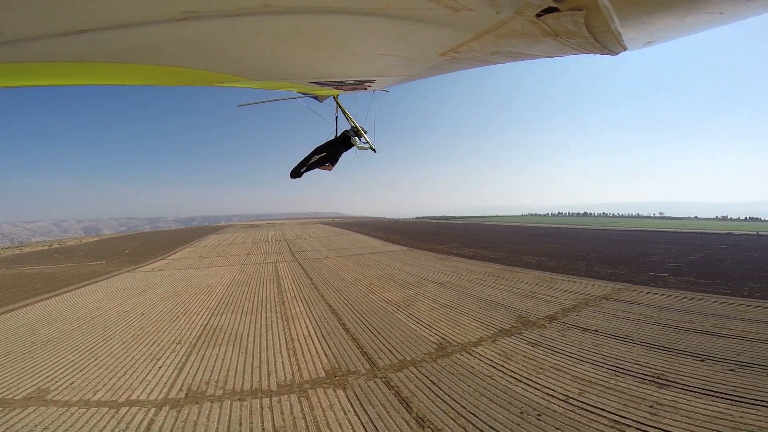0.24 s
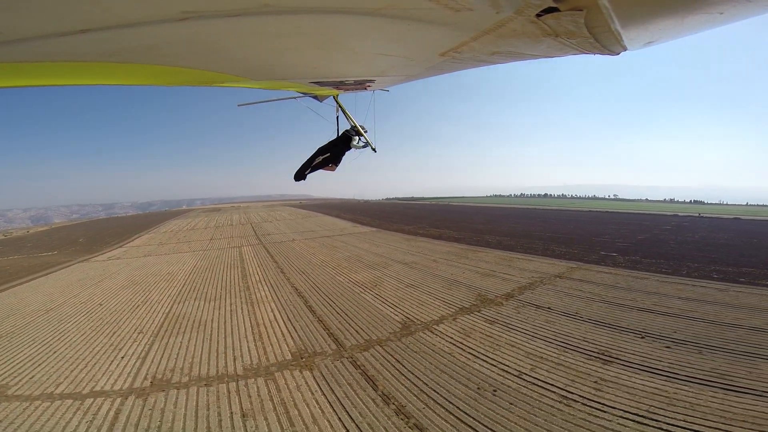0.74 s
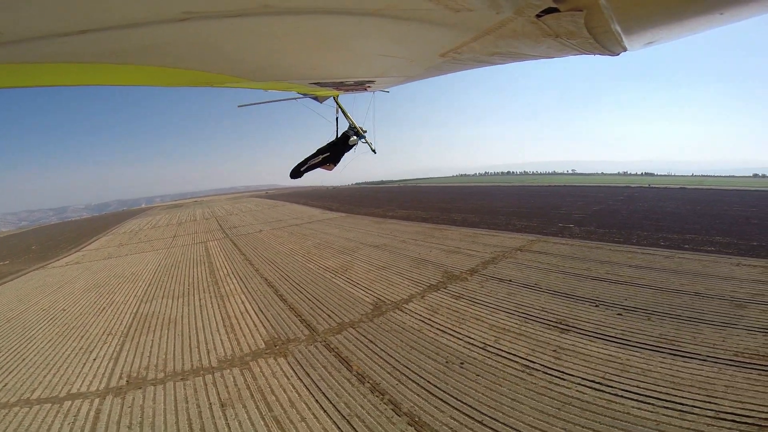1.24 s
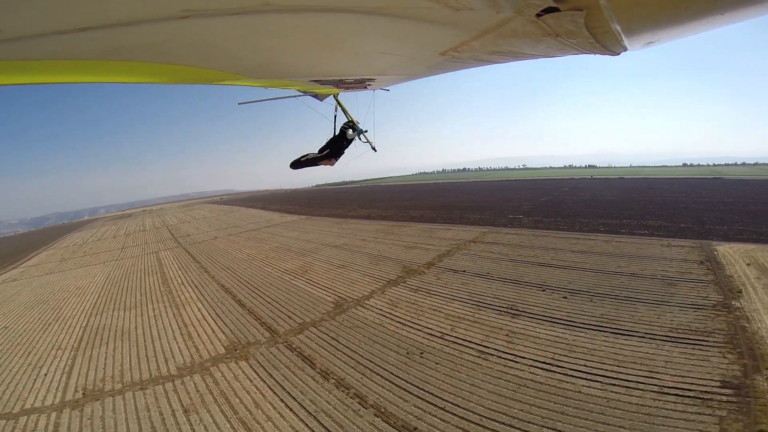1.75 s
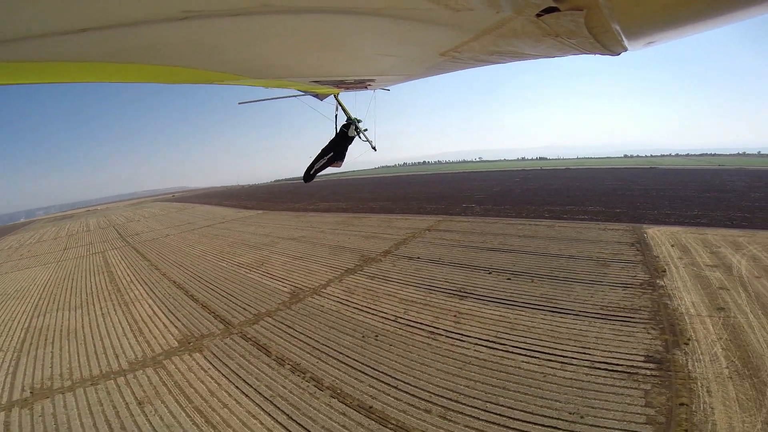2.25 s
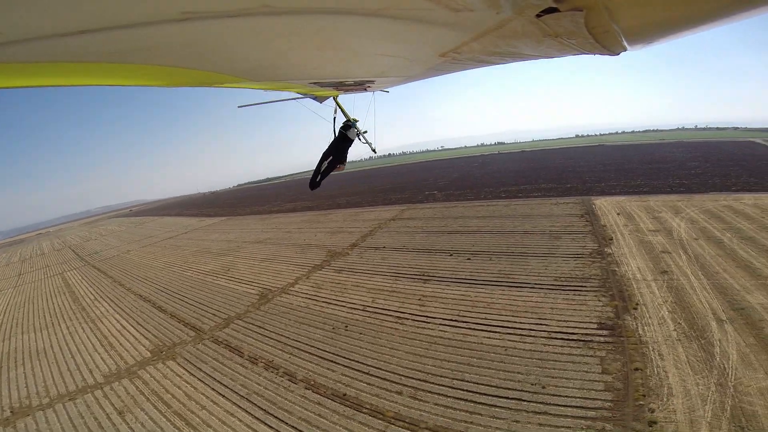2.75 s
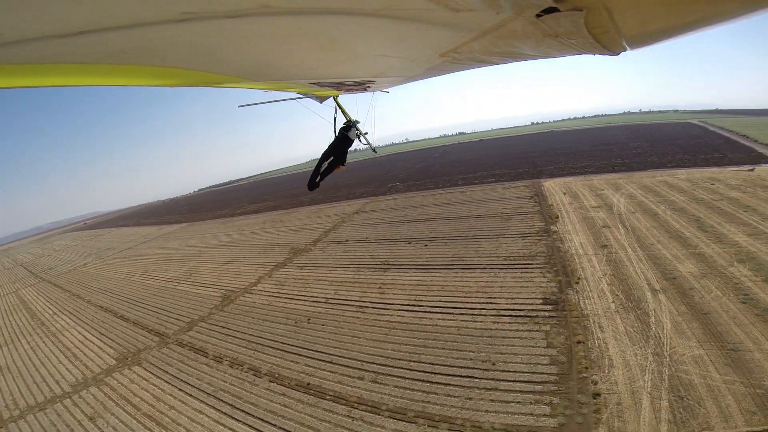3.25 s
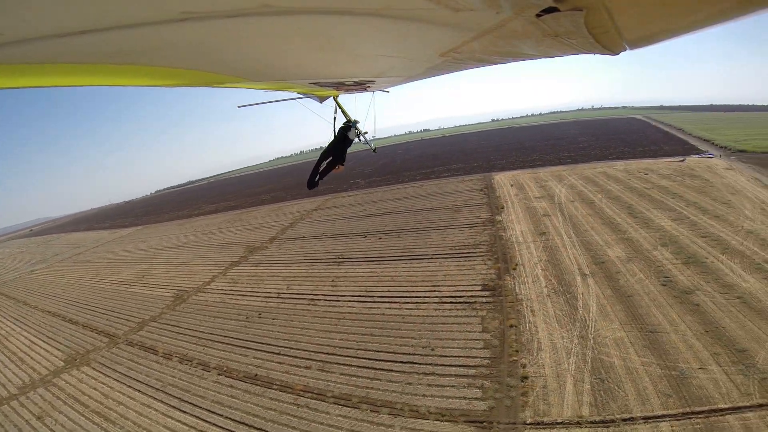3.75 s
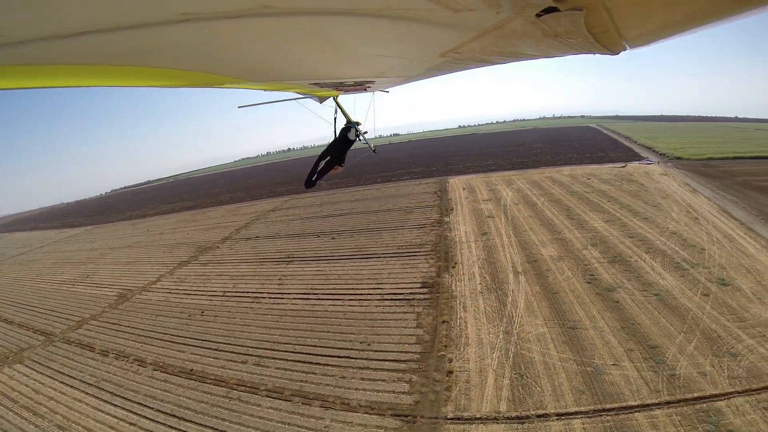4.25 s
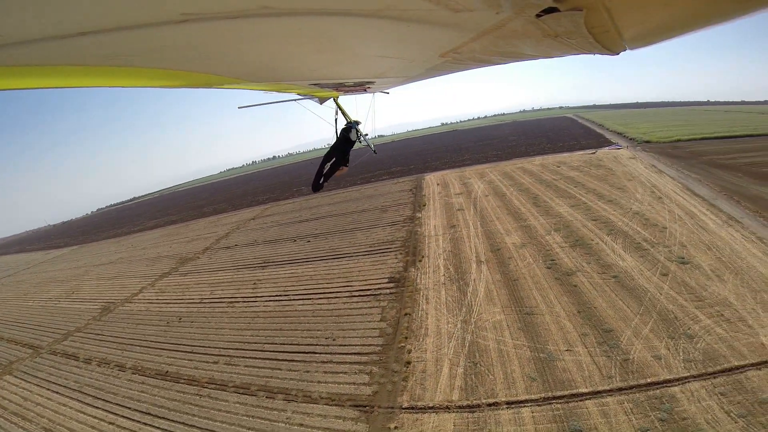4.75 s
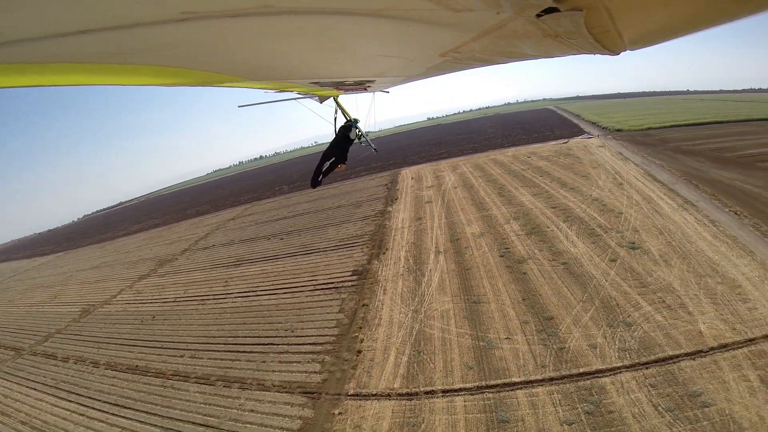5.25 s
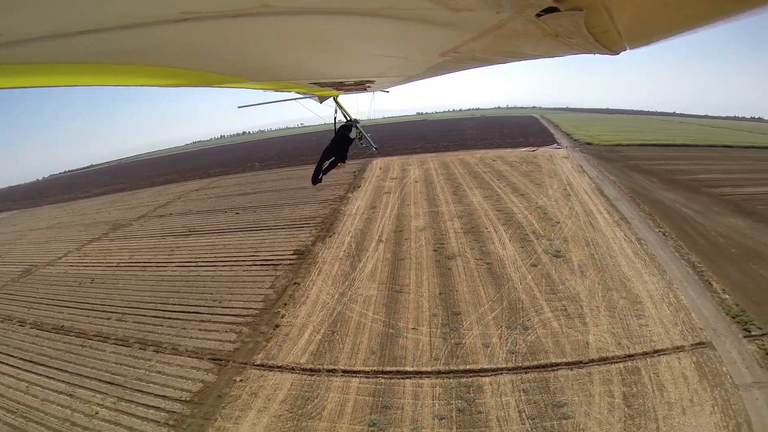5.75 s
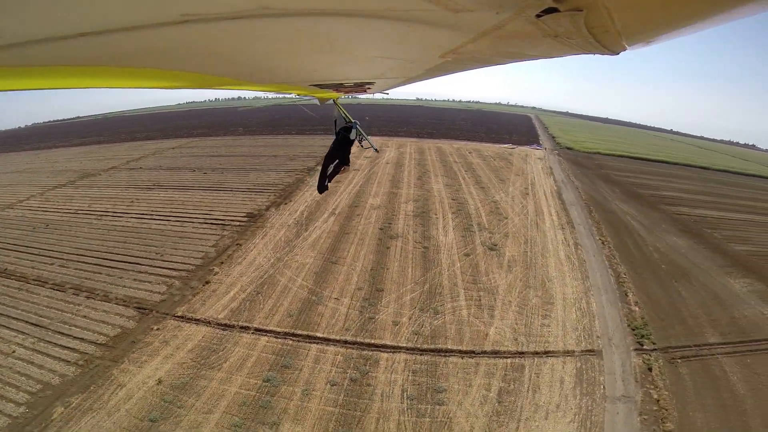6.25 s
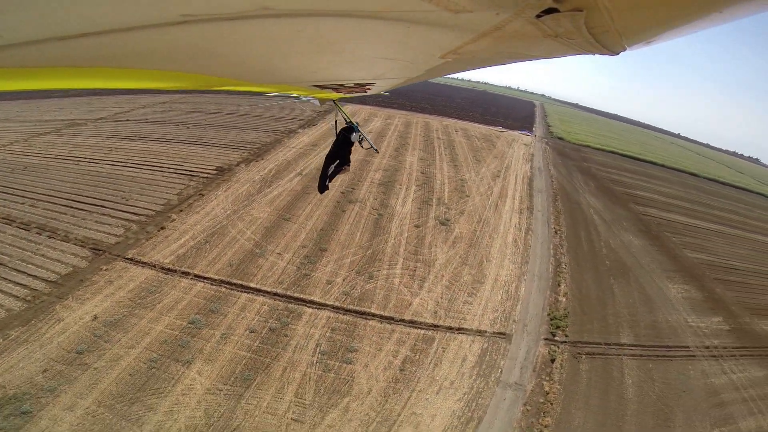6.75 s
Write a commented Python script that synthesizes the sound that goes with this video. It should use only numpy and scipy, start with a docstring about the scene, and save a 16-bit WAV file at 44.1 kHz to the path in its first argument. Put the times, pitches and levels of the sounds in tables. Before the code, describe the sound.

Close, muffled microphone in a sealed case under a hang glider wing over open fields. Low wind rumble and uneven deep fluttering run throughout. Just after two seconds the frame gives a tight cluster of dull knocks, ticks and a high dry squeak, with a smaller creak following. Then the glide settles and the airflow slowly becomes louder and hissier, with a few soft knocks and a late faint squeak.

```python
"""Under the wing of a hang glider on its landing approach, heard by a microphone sealed in a case.
The wing heaves as slow noise, its tip flutters as a wavering 41.62 Hz swing, the sail drums as coloured noise.
Air rumbles, rushes and hisses, brighter as the dive gains speed; short swells of broad noise pass.
When the pilot swings upright the frame knocks and ticks (decaying rings and noise bursts) and a dry joint
squeaks (sagging near sines); the electronics add faint tones and noise."""
import sys
import numpy as np
from scipy import signal
from scipy.fft import rfft, irfft, next_fast_len
from scipy.io import wavfile
from scipy.ndimage import uniform_filter1d

SR = 44100
rng = np.random.default_rng(int(sys.argv[2]) if len(sys.argv) > 2 else 0)


def waveform_to_disk(signal):
    """Save audio, clipped to [-1, 1], as 16-bit WAV at the path in sys.argv[1]."""
    frames = np.transpose(np.atleast_2d(signal))
    scaled = np.clip(frames, -1, 1) * 32767
    samples = np.round(scaled).astype(np.int16)
    wavfile.write(sys.argv[1], SR, samples)


N = 309141

# Uneven level of the low 41.62 Hz throbbing and of the drumming noise.
# Each row: time in seconds, throbbing level in dB, drumming level in dB.
THROB_AND_DRUM_LEVELS = [(0.0, -21, -18), (0.19, -16, -28.5), (0.29, -20, -22), (0.84, -17.5, -26),
                         (0.94, -18.5, -21), (1.35, -16, -25), (1.39, -41, -22.5), (1.44, -23.5, -23.5),
                         (1.95, -13.5, -24.5), (2.02, -27.5, -23.5), (2.08, -19.5, -17), (2.15, -13, -16.5),
                         (2.22, -19, -19), (2.28, -8, -20.5), (2.335, -10.5, -16), (2.37, -29, -13.5),
                         (2.41, -14.5, -17.5), (2.52, -22, -23), (2.57, -19, -23), (2.73, -19.5, -28),
                         (2.86, -22.5, -24), (2.92, -18, -26), (3.1, -28, -26.5), (3.2, -18.5, -25.5),
                         (3.43, -28, -23.5), (3.49, -11.5, -26.5), (3.53, -22.5, -30), (3.69, -15, -22),
                         (3.77, -28, -28.5), (3.84, -17.5, -26), (3.96, -32, -27), (4.1, -17, -29),
                         (4.3, -20, -23), (4.33, -27, -27.5), (4.45, -19.5, -24.5), (4.61, -21, -30.5),
                         (4.67, -14.5, -27.5), (4.76, -15, -24.5), (4.82, -32, -25), (5.0, -12, -31.5),
                         (5.09, -24.5, -24.5), (5.41, -17, -24.5), (5.54, -29, -21.5), (5.6, -14, -24),
                         (5.93, -25, -22.5), (6.02, -14.5, -24.5), (6.27, -19, -23), (6.32, -10, -25.5),
                         (6.38, -23, -27.5), (6.42, -16.5, -23.5), (6.52, -13, -24), (6.58, -26, -25.5),
                         (6.77, -28, -24), (6.82, -15, -26), (6.93, -14.5, -24.5), (7.01, -22.5, -27)]
FLUTTER_HZ = 41.62
# Sail drumming spectrum ahead of the frame. Each row: frequency in Hz, relative density in dB per Hz.
SAIL_SPECTRUM = [(59, -32), (100, -4.5), (205, 2.5), (219, -7.5), (237, -9.5), (300, -31), (390, -30),
                 (660, -120)]
# Slow heave of the wing. Each row: time in seconds, level in dB.
HEAVE_LEVEL = [(0, -45), (.7, -40), (1.0, -24), (1.9, -28), (2.1, -18.5), (2.6, -19), (3.0, -36),
               (7.01, -40)]
# Heave spectrum. Each row: frequency in Hz, relative density in dB per Hz.
HEAVE_SPECTRUM = [(3, -40), (6, 0), (14, 0), (22, -30), (40, -120)]

# Air over the case, rising with speed. Each row: time in seconds, hiss level in dB.
AIRFLOW = [(0.0, -42), (0.15, -43), (0.4, -46.5), (1.27, -45), (1.87, -48), (2.26, -44.5), (2.81, -44.5),
           (3.26, -43), (3.85, -42.5), (4.06, -41.5), (4.45, -41), (4.8, -40), (5.0, -38.5), (5.14, -36.5),
           (5.4, -36), (5.75, -36), (6.09, -35), (6.46, -34), (7.01, -35.5)]
# Low air rumble spectrum. Each row: frequency in Hz, relative density in dB per Hz.
RUMBLE_SPECTRUM = [(4, 8.5), (12, -7.5), (21, -3.5), (30, -1.5), (60, 0.5), (75, 3), (90, -8), (110, 0),
                   (150, -35.5), (400, -130)]
# Broad rush spectrum ahead of the frame. Each row: frequency in Hz, relative density in dB per Hz.
RUSH_SPECTRUM = [(130, -46.5), (220, -1.5), (292, -13), (453, -9.5), (693, -17.5), (1050, -18),
                 (1340, -27.5), (2380, -36), (3000, -41), (3900, -71), (6600, -120)]
# Hiss spectrum ahead of the frame. Each row: frequency in Hz, relative density in dB per Hz.
HISS_SPECTRUM = [(450, -21), (800, -3), (1500, 3), (1900, 1), (2400, -10), (3000, -9), (4100, -11),
                 (4700, -12), (6200, -16), (9000, -26), (11700, -66.5), (19800, -120)]
# Fine fizz spectrum ahead of the frame. Each row: frequency in Hz, relative density in dB per Hz.
FIZZ_SPECTRUM = [(3240, -40), (5500, -14.5), (7000, 1), (8800, -3.5), (9600, -10.5), (11000, -13.5),
                 (12500, -12), (13300, -40.5), (16000, -78)]
CRUISE_HISS_DB, CRUISE_SAIL_DB = -48, -25  # reference levels of the slow glide
# level in the slow glide, dB gained per dB of hiss, dB gained per dB of drumming
RUMBLE_DB, RUMBLE_PER_HISS, RUMBLE_PER_SAIL = -28.5, 0.37, 0.55
RUSH_DB, RUSH_PER_HISS, RUSH_PER_SAIL = -38, 0.56, 0.14
FIZZ_DB, FIZZ_PER_HISS, FIZZ_ONSET_DB = -74, 1.98, 4  # grows once the hiss has gained the onset

# Short swells of broad noise. Each row: middle in seconds, width (sigma) in seconds, top level in dB.
SWELLS = [(2.045, .015, -33), (2.123, 0.015, -24.5), (2.195, 0.014, -39), (2.31, .035, -31),
          (2.662, .005, -34), (2.748, 0.011, -31), (5.145, .015, -33), (5.23, 0.011, -32),
          (5.39, 0.013, -28.5), (6.47, 0.034, -29.5), (6.55, .012, -28)]
# Swell spectrum ahead of the frame. Each row: frequency in Hz, relative density in dB per Hz.
SWELL_SPECTRUM = [(150, -41), (250, 3), (500, -5.5), (900, -9), (1300, -21.5), (2000, -36), (4000, -89.5)]

# Resonances of frame and case. Each row: centre in Hz, width in Hz, lift in dB (negative cuts).
FRAME_RESONANCES = [(122.8, 29, -1), (168.5, 20, 3), (207.7, 14, 1.5), (289.3, 25.7, 6.5), (417, 187, 7.5),
                    (473.4, 134, 5), (617, 32, 10), (791, 99, 9), (1107, 282, 8.5), (1556, 290, 5.5),
                    (1897, 110, -4.5), (2400, 660, 16.5), (2730, 84, 1.5), (3710, 720, 7), (4122, 340, 11),
                    (5440, 530, 12), (5870, 250, -0.5), (7800, 18, -13)]
# Dull knocks. Each row: start in seconds, drive ahead of the frame in dB, ring in Hz, share of dull shake.
KNOCKS = [(2.03, -30, 437, 0.68), (2.03, -10.5, 173.4, .03), (2.072, -14, 169, .03),
          (2.045, -29, 404, 0.45), (2.073, -36, 443, 0.68), (2.103, -27.5, 804, 0.96),
          (2.112, -29, 407, 0.73), (2.124, -16.5, 597, 0.3), (2.127, -4.5, 125, 0.027),
          (2.14, -23.5, 624, 0.24), (2.151, -34.5, 391, .5), (2.145, -28, 1080, .3), (2.168, -38, 450, .5),
          (2.188, -31, 1090, 0.33), (2.199, -12, 181.6, .03), (2.19, -33, 417, 0.68),
          (2.221, -31, 390, 0.39), (2.283, -26, 350, 0.2), (2.286, -15.5, 122, .03), (2.299, -35, 1100, .4),
          (2.299, -13.5, 205, .03), (2.305, -26.5, 426, 0.43), (2.338, -32, 1090, 0.39),
          (2.34, -30, 580, 0.6), (2.351, -8.5, 123.7, 0.038), (2.385, -15, 118, .03),
          (2.388, -37, 462, 0.39), (2.659, -30.5, 960, 0.39), (2.737, -34, 465, 1.3),
          (5.233, -24, 1040, 0.34), (6.455, -22.5, 1030, 0.39)]
KNOCK_LOAD_S, KNOCK_RING_CYCLES = 0.0031, 4.4  # time constants of rise and ring
KNOCK_CUT_HZ, KNOCK_SHAKE_S = 800, 0.0079  # shake: low-pass, time constant

# Squeaks of a dry joint. Each row: start in seconds, time to peak in seconds, length in seconds,
# peak level in dB rms, starting pitch in Hz, sag in Hz, fade in dB, unevenness of grip in dB.
SQUEAKS = [(1.521, 0.014, 0.019, -37, 2790, 301, 8, 1), (1.541, 0.008, 0.015, -33.5, 2790, 429, 10, 3),
           (1.555, .004, .018, -42, 2620, 60, 6, 2), (1.909, .004, 0.031, -30.5, 2640, 21, 12, 4),
           (1.941, 0.0046, 0.014, -45, 2570, 42, 6, 3.5), (2.144, .003, 0.0057, -26, 2630, 301, 3, 1),
           (2.146, 0.006, 0.077, -15.5, 2460, 90, 28, 1.5), (2.18, .007, 0.012, -47, 3520, -300, 3, 6),
           (2.337, .005, .012, -52, 3700, 501, 4, 4), (2.436, .006, 0.014, -46, 3670, 0, 4, 5),
           (2.453, .005, 0.01, -28, 2685, 250, 3, 3), (2.459, 0.012, 0.02, -20, 2554, 121, 9, 1),
           (2.481, .009, 0.033, -30.5, 2600, 154, 15, 2), (6.736, 0.0088, 0.033, -27.5, 2420, 36, 24, 1)]
SQUEAK_RISE_DB, SQUEAK_SAG_S = 14.5, 0.0141  # climb to the peak, time constant of the sag

# Sharp ticks of hardware. Each row: start in seconds, drive ahead of the frame in dB, ring in Hz,
# relative snap strength, top of the snap in Hz.
TICKS = [(1.1922, -43, 5500, 3.3, 7200), (1.1936, -45, 2520, .1, 4000), (1.911, -36.5, 2480, .1, 5000),
         (2.0215, -48, 5150, 3.5, 9500), (2.0215, -58, 11900, .3, 13000), (2.102, -35, 3600, .2, 4500),
         (2.109, -51, 5400, 0.56, 6200), (2.119, -40, 3700, .2, 4500), (2.122, -38, 2550, .1, 4000),
         (2.124, -63.5, 11900, .3, 13000), (2.125, -36, 3600, .4, 7000), (2.126, -54, 5400, .3, 7000),
         (2.126, -34, 2490, .2, 6000), (2.146, -36, 2760, .03, 3500), (2.394, -40, 2640, .1, 4030),
         (2.739, -33, 3550, .06, 4040), (2.743, -53, 2450, .1, 3480), (4.868, -47, 4080, .2, 5000)]
TICK_LOAD_S, TICK_T60_S = .0006, .010  # time constant of rise, 60 dB decay time of ring
SNAP_S = .001  # time constant
TICK_RATTLE, RATTLE_S = .12, .004  # chatter share, time constant

# Steady electronics tones. Each row: frequency in Hz, level in dB rms.
WHINE_TONES = [(11568.4, -92), (14625.4, -93)]
SENSOR_HZ, SENSOR_DB_RMS, SENSOR_RESTARTS_PER_S = 11705, -77.5, 30 / 1.001
SELF_NOISE_DB, SELF_NOISE_TOP_HZ = -71, 12500  # level ahead of the low-pass
CUTOFF_HZ = 15100


def amp(db):
    """Decibels to gain."""
    return 10 ** (np.asarray(db) / 20)


def rms_one(x):
    """Scale to unit rms."""
    return x / np.sqrt(np.mean(x ** 2) + 1e-20)


def in_time(rows):
    """Interpolate each column of a curve at every sample."""
    s, *columns = np.transpose(rows)
    return [np.interp(np.arange(N) / SR, s, c) for c in columns]


def drift(rate_hz):
    """Slow random wander of spread 1: two-pole low-passed noise, made at SR / 40."""
    r = np.exp(-80 * np.pi * rate_hz / SR)
    noise = rng.standard_normal(N // 40 + 2002)
    slow = signal.lfilter([1], [1, -2 * r, r * r], noise)[2000:]  # drop the settling
    return np.interp(np.arange(N) / 40, np.arange(len(slow)), rms_one(slow))


def coloured(spectrum):
    """Noise of a given spectrum, interpolated over log frequency."""
    hz, db = np.transpose(spectrum)
    size = next_fast_len(N)
    grid_hz = np.maximum(np.arange(size // 2 + 1) * SR / size, 1)
    gain = amp(np.interp(np.log(grid_hz), np.log(hz), db))
    return irfft(rfft(rng.standard_normal(size)) * gain, size)[:N]


def frame(x):
    """Frame and case resonances: a chain of peaking filters."""
    for hz, width_hz, lift_db in FRAME_RESONANCES:
        w, lift = 2 * np.pi * hz / SR, amp(lift_db / 2)
        damp = np.pi * width_hz / SR
        x = signal.lfilter([1 + damp * lift, -2 * np.cos(w), 1 - damp * lift],
                           [1 + damp / lift, -2 * np.cos(w), 1 - damp / lift], x)
    return x


def flutter(waver=0.0998, throb_db=1.0, swell_hz=22, steady=2.23):
    """Wing tip flutter: a low throbbing swing whose rate wavers and whose size varies at random."""
    level_db, _ = in_time(THROB_AND_DRUM_LEVELS)
    turns = np.cumsum(FLUTTER_HZ * (1 + waver * drift(8.95))) / SR
    in_phase = (steady + drift(swell_hz)) * np.sin(2 * np.pi * turns)
    quadrature = drift(swell_hz) * np.cos(2 * np.pi * turns)
    return amp(level_db + throb_db * drift(35)) * rms_one(in_phase + quadrature)


def sail(even=0.29, window_s=0.041):
    """Low turbulence shakes the cloth; its tension evens out part of the swells."""
    _, level_db = in_time(THROB_AND_DRUM_LEVELS)
    drum = frame(coloured(SAIL_SPECTRUM))
    power = uniform_filter1d(drum ** 2, round(window_s * SR)) + 1e-12
    return amp(level_db) * rms_one(drum * power ** (-even / 2))


def sway():
    """The whole wing heaves below the flutter while the pilot shifts weight: levelled low noise."""
    level_db, = in_time(HEAVE_LEVEL)
    heave = coloured(HEAVE_SPECTRUM)
    running_rms = np.sqrt(uniform_filter1d(heave ** 2, SR // 3))
    return amp(level_db) * heave / running_rms


def air(gust_db=0.99):
    """Turbulent air: speed raises rumble, rush, hiss and fizz; the first two also follow the drumming."""
    hiss_db, = in_time(AIRFLOW)
    _, sail_db = in_time(THROB_AND_DRUM_LEVELS)
    faster_db, drumming_db = hiss_db - CRUISE_HISS_DB, sail_db - CRUISE_SAIL_DB
    gust = gust_db * drift(2.5)  # shared by hiss and fizz
    rumble_db = RUMBLE_DB + RUMBLE_PER_HISS * faster_db + RUMBLE_PER_SAIL * drumming_db
    rumble = rms_one(coloured(RUMBLE_SPECTRUM)) * amp(rumble_db)
    rush_db = RUSH_DB + RUSH_PER_HISS * faster_db + RUSH_PER_SAIL * drumming_db
    rush = rms_one(frame(coloured(RUSH_SPECTRUM))) * amp(rush_db + gust_db * drift(1.3))
    hiss = rms_one(frame(coloured(HISS_SPECTRUM))) * amp(hiss_db + gust)
    fizz_db = FIZZ_DB + FIZZ_PER_HISS * np.maximum(faster_db - FIZZ_ONSET_DB, 0)
    fizz = rms_one(frame(coloured(FIZZ_SPECTRUM))) * amp(fizz_db + gust)
    return rumble + rush + hiss + fizz


def swells():
    """Short Gaussian swells of broad noise."""
    t, size = np.arange(N) / SR, np.zeros(N)
    for middle_s, width_s, level_db in SWELLS:
        size += amp(level_db) * np.exp(-.5 * ((t - middle_s) / width_s) ** 2)
    return size * rms_one(frame(coloured(SWELL_SPECTRUM)))


def knocks():
    """Each blow loads the frame softly: a decaying ring plus a dull noise shake, through the frame."""
    out, t = np.zeros(N), np.arange(round(.12 * SR)) / SR
    load = 1 - np.exp(-t / KNOCK_LOAD_S)
    low_pass = signal.butter(3, KNOCK_CUT_HZ, fs=SR, output="sos")
    high_pass = signal.butter(1, 250, "high", fs=SR)
    for start_s, drive_db, ring_hz, shake_share in KNOCKS:
        shake = signal.sosfilt(low_pass, rng.standard_normal(len(t)))
        shake = rms_one(signal.lfilter(*high_pass, shake)) * np.exp(-t / KNOCK_SHAKE_S)
        ring = np.sin(2 * np.pi * ring_hz * t) * np.exp(-t * ring_hz / KNOCK_RING_CYCLES)
        at = round(start_s * SR)
        out[at:at + len(t)] += amp(drive_db) * load * (ring + shake_share * shake)
    return frame(out + 1e-18)


def squeaks(edge_s=0.0034, shiver=0.0079, third_db=-54):
    """Stick-slip locks onto a resonance: a near sine that swells, fades, sags and shivers in pitch."""
    out, t = np.zeros(N), np.arange(round(.1 * SR)) / SR
    grip, wobble = drift(150), drift(157)
    for start_s, attack_s, length_s, peak_db, start_hz, sag_hz, fade_db, grip_db in SQUEAKS:
        at = round(start_s * SR)
        on = slice(at, at + len(t))
        drop_db = np.interp(t, [0, attack_s, length_s], [SQUEAK_RISE_DB, 0, fade_db])
        size = amp(peak_db - drop_db + grip_db * grip[on])
        size *= np.clip(np.minimum(t, length_s - t) / edge_s + .5, 0, 1)
        pitch_hz = start_hz - sag_hz * (1 - np.exp(-t / SQUEAK_SAG_S))
        phase = 2 * np.pi * np.cumsum(pitch_hz * (1 + shiver * wobble[on])) / SR
        out[on] += np.sqrt(2) * size * (np.sin(phase) + amp(third_db) * np.sin(3 * phase))
    return out


def ticks():
    """Hardware contact: a bright snap, a brief ring and loose chatter just below the ring's pitch."""
    out, t = np.zeros(N), np.arange(round(.05 * SR)) / SR
    for start_s, drive_db, ring_hz, snap_share, top_hz in TICKS:
        load = 1 - np.exp(-t / TICK_LOAD_S)
        ring = np.sin(2 * np.pi * ring_hz * t) * amp(-60 * t / TICK_T60_S) * load
        crackle = rms_one(rng.standard_normal(len(t))) * np.exp(-t / SNAP_S)
        snap_band = signal.butter(4, [2200, top_hz], "band", fs=SR, output="sos")
        snap = snap_share * signal.sosfilt(snap_band, .6 * crackle)
        loose_band = signal.butter(2, [0.86 * ring_hz, 0.88 * ring_hz], "band", fs=SR)
        loose = signal.lfilter(*loose_band, rng.standard_normal(len(t)))
        rattle = TICK_RATTLE * rms_one(loose) * np.exp(-t / RATTLE_S)
        at = round(start_s * SR)
        out[at:at + len(t)] += amp(drive_db) * (ring + snap + rattle)
    return frame(out + 1e-18)


def whine():
    """Electronics: faint steady tones, one periodically restarted tone, and low-passed self-noise."""
    t = np.arange(N) / SR
    tones = np.zeros(N)
    for hz, db in WHINE_TONES:
        tones += np.sqrt(2) * amp(db) * np.sin(2 * np.pi * (hz * t + rng.random()))
    since_restart_s = (t + rng.random()) % (1 / SENSOR_RESTARTS_PER_S)
    tones += np.sqrt(2) * amp(SENSOR_DB_RMS) * np.sin(2 * np.pi * SENSOR_HZ * since_restart_s)
    low_pass = signal.butter(4, SELF_NOISE_TOP_HZ, fs=SR, output="sos")
    return tones + amp(SELF_NOISE_DB) * signal.sosfilt(low_pass, rng.standard_normal(N))


def scene():
    """Sum all sources at one microphone."""
    wing = flutter() + sail() + sway()
    wind = air() + swells()
    contacts = knocks() + squeaks() + ticks()
    return (wing + wind + contacts + whine())[None]


def record(dry):
    """Round the peaks by soft saturation, then cut the top with a steep low-pass."""
    rounded = 1.8 * np.tanh(dry / 1.8)
    low_pass = signal.ellip(10, .5, 60, CUTOFF_HZ, fs=SR, output="sos")
    return signal.sosfilt(low_pass, rounded)


dry = scene()
out = record(dry)
waveform_to_disk(out)
```